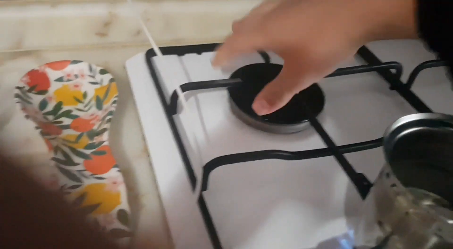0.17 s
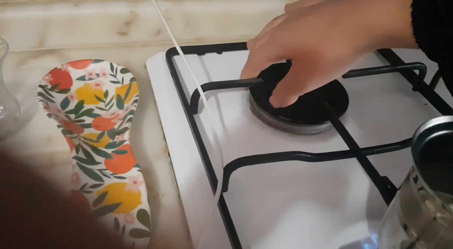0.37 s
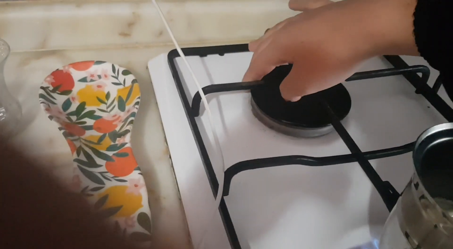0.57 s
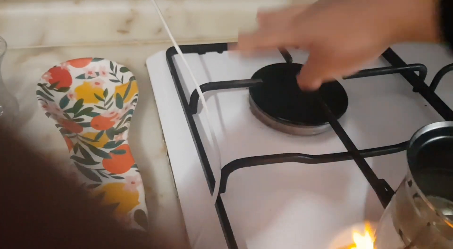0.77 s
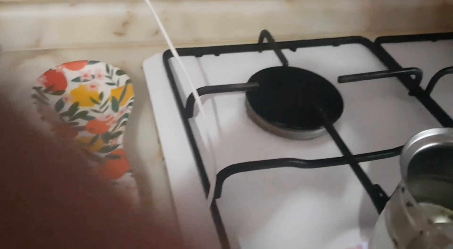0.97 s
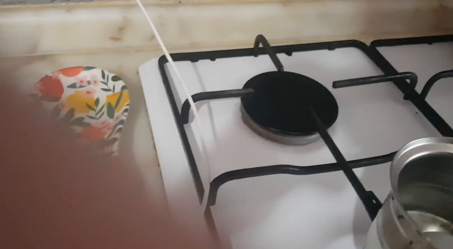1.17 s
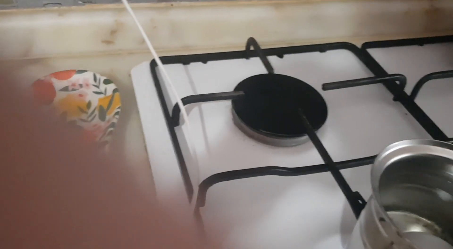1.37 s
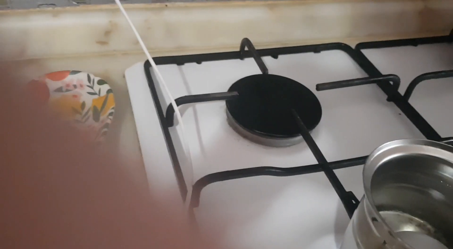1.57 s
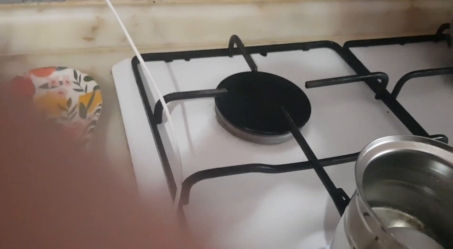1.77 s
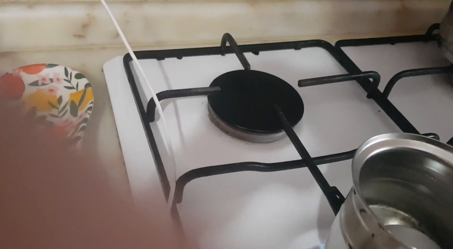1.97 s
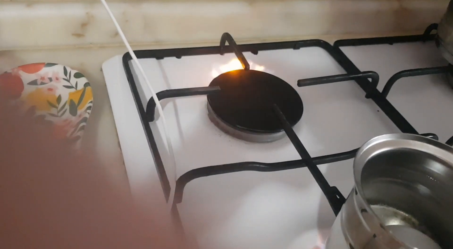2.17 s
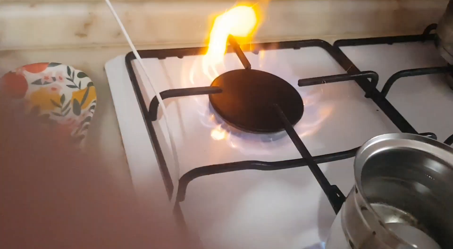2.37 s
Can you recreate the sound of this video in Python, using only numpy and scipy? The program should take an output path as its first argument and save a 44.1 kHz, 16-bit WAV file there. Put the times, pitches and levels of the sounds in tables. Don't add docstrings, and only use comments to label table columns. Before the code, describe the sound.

A metal burner cap clanks onto a gas stove, then an igniter snaps twice and flame catches

```python
import sys
import numpy as np
from scipy import signal
from scipy.fft import rfft, irfft
from scipy.io import wavfile
from scipy.ndimage import uniform_filter1d

SR = 44100
rng = np.random.default_rng(int(sys.argv[2]) if len(sys.argv) > 2 else 0)


def master_out(mix):
    frames = np.transpose(np.atleast_2d(mix))
    ceiling = np.clip(frames, -1, 1)
    pcm = np.round(ceiling * 32767).astype(np.int16)
    wavfile.write(sys.argv[1], SR, pcm)


def level_to_linear(level):
    exponent = np.asarray(level, float) / 20
    return 10 ** exponent


N = 106369
T = np.arange(N) / SR
LEFT_RIGHT = np.array([[1], [-1]])
HELD = T < 0.7
TREBLE_LEFT_DB = 6


def unit(x):
    return x / np.sqrt(np.mean(x ** 2) + 1e-30)


def curve(rows, col=1):
    return np.interp(T, [r[0] for r in rows], [r[col] for r in rows])


def colour(x, points):
    f = np.arange(x.shape[-1] // 2 + 1) * SR / x.shape[-1] + 1
    p = np.array(points, float)
    gain = level_to_linear(np.interp(np.log(f), np.log(p[:, 0]), p[:, 1]))
    return irfft(rfft(x) * gain, x.shape[-1])


def band(x, hz, width_hz):
    return signal.lfilter(*signal.iirpeak(min(hz, .45 * SR), max(hz / width_hz, .3), SR), x)


def ring(x, modes):
    total = 0
    for hz, db, t60 in modes:
        pole = np.exp(2j * np.pi * hz / SR - np.log(1000) / (t60 * SR))
        total = total + level_to_linear(db) * signal.lfilter([1], [1, -pole], x).imag
    return total


def pair(alike_hz):
    mid, side = rng.standard_normal((2, N))
    treble = signal.butter(2, alike_hz, "high", fs=SR, output="sos")
    side = 0.23 * side + signal.sosfilt(treble, side)
    return np.array([mid + side, mid - side])


def walk(rate):
    k = int(SR / rate)
    return unit(uniform_filter1d(uniform_filter1d(rng.standard_normal(N), k), k))


def tail(x, t60, top_t60, points=((20, 0), (20000, 0)), alike_hz=600):
    noise = colour(pair(alike_hz), points)[:, :SR // 2]
    low = signal.sosfilt(signal.butter(1, 2500, fs=SR, output="sos"), noise)
    t = T[:SR // 2]
    h = low * level_to_linear(-60 * t / t60) + (noise - low) * level_to_linear(-60 * t / top_t60)
    return signal.fftconvolve(x[None], h / np.sqrt(np.sum(h ** 2) / 2), axes=1)[:, :N]


def ports(x, left_db):
    lag_s = .00005
    top = signal.sosfilt(signal.butter(1, 1500, "high", fs=SR, output="sos"), x)
    left = x + (level_to_linear(left_db / 2) - 1) * top
    right = np.interp(T - lag_s, T, x + (level_to_linear(-left_db / 2) - 1) * top)
    return np.array([left, right])


def burst(at, rise, hold, fall):
    attack = np.clip((T - at) / rise, 0, 1)
    return attack * np.exp(-np.clip(T - at - rise - hold, 0, None) / fall)


# f/Hz, spectral level/dB
KITCHEN_COLOUR = [(15, -50), (25, -14.5), (75, -10), (159, -11.5), (195, -34.5), (253, -11), (324, -22),
                  (415, -14.5), (540, -25.5), (680, -60), (1300, -88.5), (2200, -120)]
# t/s, level/dB
KITCHEN_LEVEL = [(0, -55), (.3, -47.5), (1.0, -49), (1.3, -57.5), (1.45, -58), (1.55, -49), (1.7, -57),
                 (2.42, -63)]
# f/Hz, spectral level/dB
HISS_COLOUR = [(410, -28), (700, -15.5), (900, -28), (1840, -10), (3410, -32), (4730, -5), (5840, -22.5),
               (11700, -7.5), (16000, -21.5)]
# f/Hz, spectral level/dB
SLEEVE_COLOUR = [(150, -19), (300, 5), (800, -1.5), (1900, -8.5), (2300, -17.5), (2900, -20.5),
                 (3500, -14.5), (4500, -22.5)]
# t/s, level/dB
SLEEVE_LEVEL = [(0, -53), (.05, -53), (.1, -62.5), (.2, -75.5), (.5, -66), (.58, -53.5), (.68, -54.5),
                (.74, -66), (.8, -100)]


def kitchen():
    low = unit(colour(pair(1200), KITCHEN_COLOUR)) * level_to_linear(curve(KITCHEN_LEVEL) + 2 * walk(36))
    sleeve = unit(colour(pair(800), SLEEVE_COLOUR)) * level_to_linear(curve(SLEEVE_LEVEL) + 2 * walk(40))
    hiss = level_to_linear(-67.5 + 4.5) * unit(colour(pair(300), HISS_COLOUR))
    return low + hiss + sleeve


# t/s, level/dB, contact hardness f/Hz, level of the rough edge/dB
KNOCKS = [(0.3122, -24.5, 750, -15), (0.3165, -36, 1200, -14), (0.333, -28.5, 1190, -7),
          (0.3793, -29.5, 900, -17), (0.3868, -21.5, 2100, -25), (0.3884, -10, 2700, -19),
          (0.391, -22, 2580, -19), (0.402, -39, 700, -7.5), (0.406, -40, 1200, -9),
          (0.4487, -22.5, 1720, 13.5), (0.4483, -19, 1650, 5.5), (0.534, -44.5, 1000, -1.5),
          (0.7544, -6, 1800, 17), (0.7572, -11.5, 2500, 5), (0.7611, -17.5, 1500, 5.5),
          (0.771, -12.5, 2190, -2), (0.7751, -21.5, 2470, 0.5), (0.794, -39.5, 496, -4)]


def knock_forces():
    push, edge = np.zeros(N), np.zeros(N)
    contact_s = .00015
    for at, db, hard_hz, edge_db in KNOCKS:
        grit = (1 + rng.standard_normal(N)) * burst(at, .0001, 0, contact_s)
        blow = burst(at, 0.00025, 0, 0.14 / hard_hz)
        push -= level_to_linear(db) * blow / blow.sum() * 4
        edge += level_to_linear(db + edge_db) * grit / np.sqrt(np.sum(grit ** 2))
    return push, edge


# t/s, level/dB
SCRAPE = [(.308, -80.5), (.314, -30), (.345, -39.5), (.365, -52), (.385, -22.5), (.42, -57.5), (.46, -41),
          (.55, -80.5)]


def scrape_force():
    slips_per_s = 1100
    slips = (rng.random(N) < slips_per_s / SR) * rng.standard_normal(N)
    return level_to_linear(curve(SCRAPE)) * unit(slips)


CAP_HZ = [1135, 1190, 1254, 2350, 3328, 4800, 5600, 6277, 6530, 7811, 8866, 10080, 10760, 11850, 13300]
# level/dB, T60/s
CAP_MODES = [(-9.5, 0.058), (2.5, 0.04), (-15.5, 0.044), (-19.5, 0.0614), (-16, 0.18), (-13, 0.04),
             (-28, 0.16), (-17.5, 0.13), (-12.5, 0.08), (-23.5, 0.095), (-12.5, 0.23), (-14, 0.31),
             (-11, 0.17), (-13.5, 0.084), (-16, 0.065)]
# f/Hz, level/dB, T60/s
RIM_MODES = [(7138, -19.5, .07), (7370, -21.5, .1), (7950, -19.5, 0.0584), (9040, -8.5, 0.082),
             (9586, -5.5, 0.097), (9200, -3, .07), (11066, -11, 0.0805), (11390, -9, .08), (12180, -9, .1),
             (12680, -9, 0.12), (13800, -13.5, .1), (14230, -14.5, .1), (14630, -15.5, .1)]


def cap_ringing(edge, slide):
    held_t60_s = 0.052
    free = [(hz, *mode) for hz, mode in zip(CAP_HZ, CAP_MODES)]
    damped = [(hz, db, min(t60, held_t60_s)) for hz, db, t60 in free]
    body = ring((edge + 0.58 * slide) * HELD, damped) + ring(edge * ~HELD, free)
    held_rim = ring(edge * HELD, [(6600, 1, .1), (11770, -3.5, .12), (13300, -4, .1)])
    return level_to_linear(-27.5) * body + level_to_linear(-42.5) * held_rim + level_to_linear(-44) * ring(edge * ~HELD, RIM_MODES)


# f/Hz, level/dB, T60/s
PRESSED_MODES = [(120.4, 0.5, 0.15), (168.9, 1, 0.13), (200, -6.5, 0.26), (295, -12, 0.16), (324, 5, .07),
                 (412, -0.5, 0.051), (478, 1, 0.1), (570, -3, 0.08), (677, 4, 0.08), (920, -26, .06),
                 (1311, -11.5, 0.0277)]
# f/Hz, level/dB, T60/s
PANEL_MODES = [(117.2, 5, 0.33), (173.2, 7, 0.38), (188, -3, 0.31), (237, -21, 0.25), (310.7, -11, .3),
               (399, -7, 0.1937), (463, -2, 0.382), (595, -9, 0.44), (588.5, -6.5, 0.3), (680, -9, 0.33),
               (865, -29, 0.038), (1540, -2, 0.12)]
# f/Hz, level/dB, T60/s
BOOM_MODES = [(74.2, 2, 1.07)]
# f/Hz, level/dB, T60/s
CRACK_MODES = [(394, -3, 0.033), (595, -0.5, 0.014), (1180, 4.5, 0.012), (2408, 0, 0.019), (3400, 2, 0.013),
               (4440, -14, 0.024)]


def stove_ringing(push, slide):
    panel = ring((push + 1.06 * slide) * HELD, PRESSED_MODES) + ring(push * ~HELD, PANEL_MODES)
    boom = ring(push * level_to_linear(-15.5 * HELD), BOOM_MODES)
    thud = ring(push - band(push, 45.15, 250), CRACK_MODES)
    return level_to_linear(-27) * panel + level_to_linear(-34.5) * boom + level_to_linear(-8.5) * thud


# f/Hz, spectral level/dB
CLATTER_COLOUR = [(60, -38), (150, -4), (400, -12), (900, -18), (1200, -14), (1800, -21.5), (2420, -11.5),
                  (6380, -20), (14700, -45), (15300, -80.5)]
# f/Hz, spectral level/dB
HELD_CLATTER_COLOUR = [(60, -37.5), (150, -9.5), (400, -16.5), (850, -11), (1250, -8.5), (1800, -18.5),
                       (2420, -21), (4500, -28), (7500, -44.5), (15000, -45.5)]


def cap():
    push, edge = knock_forces()
    slide = scrape_force()
    near = cap_ringing(edge, slide) + stove_ringing(push, slide)
    near -= .7 * band(near, 834, 420)
    shake = edge + .3 * push + .5 * slide
    rattle = tail(shake * ~HELD, 0.29, 0.18, CLATTER_COLOUR)
    rattle = rattle + 1.2 * tail(shake * HELD, 0.17, 0.26, HELD_CLATTER_COLOUR)
    across = level_to_linear(-6) * band(near, 610, 260) * np.array([[-1.3], [.7]])
    return ports(near, TREBLE_LEFT_DB) + across, 10 * level_to_linear(-19.5) * rattle


# f/Hz, spectral level/dB
ROCK_COLOUR = [(1500, -29), (2400, -10.5), (2900, -10.5), (3500, -1), (4700, -4.5), (5500, -9), (6500, -4),
               (7000, -27.5)]
# f/Hz, level/dB, T60/s
BELL_MODES = [(6600, 3, 0.5), (6420, 8, 0.41), (4300, 18.5, .047), (4270, 14, 0.037), (4780, 19.5, .06),
              (4880, 17.5, .04)]


def drop():
    drop_s, chatter_t60_s = .7548, .3
    hit = np.zeros(N)
    hit[int(drop_s * SR)] = 1
    colours = ROCK_COLOUR + [(14700, -38.5), (15300, -70)]
    chatter = tail(hit, chatter_t60_s, chatter_t60_s, colours) * level_to_linear(1.9 * walk(300))
    return level_to_linear(2) * chatter + level_to_linear(-38.5) * ports(ring(hit, BELL_MODES), TREBLE_LEFT_DB)


TICK_AT_S = [1.389, 1.494, 1.501, 1.502, 1.538, 1.550, 1.553, 1.565]
# level/dB, f/Hz, width/Hz
TICKS = [(-68, 6100, 3300), (-49.5, 4360, 1250), (-56, 3400, 1160), (-59, 10500, 4200), (-48, 4400, 13000),
         (-53, 15000, 6900), (-47.5, 1300, 2000), (-56, 5900, 710)]
GRIP_AT_S = [
    1.395,
    1.50,
    1.545,
]
GRIP_DB = [-50, -45, -50]


def knob():
    ticks = 0
    for at, (db, hz, width_hz) in zip(TICK_AT_S, TICKS):
        tone = unit(band(rng.standard_normal(N), hz, width_hz))
        ticks = ticks + level_to_linear(db) * tone * burst(at, 0.0006, 0, 0.0032)
    grip = sum(level_to_linear(db) * burst(at, 0.012, 0, 0.043) for at, db in zip(GRIP_AT_S, GRIP_DB))
    soft = [(100, -20), (427, 0), (630, -6), (2.08 * 630, -30), (4000, -45)]  # f/Hz, level/dB
    thud = grip * unit(colour(pair(757), soft))
    return ports(ticks, 17.4) + level_to_linear(0.5) * 2 * tail(ticks, 0.29, 0.1) + thud


JET_HZ = [1165, 3100, 3700, 4580, 6120, 7070, 10300, 11300, 7000]
# width/Hz, level/dB
JET = [(104, 6.5), (430, -9), (297.6, -10.5), (252, -5), (400.9, -14), (190.77, -12), (900, -12.5),
       (1000, -8), (11900, -19)]
# t/s, level/dB
FLOW = [
    (1.5, -78),
    (1.6, -67),
    (1.635, -50.5),
    (2.17, -48.5),
    (2.25, -48.5),
    (2.42, -53),
]


def gas():
    whistle = 0
    for hz, (width_hz, db) in zip(JET_HZ, JET):
        once = band(pair(2000), hz, 1.7 * width_hz)
        whistle = whistle + level_to_linear(db + 1.8 * walk(25)) * band(once, hz, 1.7 * width_hz)
    return unit(whistle) * level_to_linear(curve(FLOW) + 1.5 * LEFT_RIGHT)


SPARK_S = [
    1.7661,
    2.1844,
]
SPARK_DB = [-14.5, -15]
# f/Hz, spectral level/dB
SPARK_COLOUR = [(120, -25), (300, -16), (800, -29), (2330, -21), (3370, -8), (5230, -12), (6760, -0.5),
                (9580, -4.5), (12200, -1.5), (16000, -22.5)]
# f/Hz, spectral level/dB
WASH_COLOUR = [(200, -21), (2000, -11.5), (4000, -5.5), (7000, -0.5), (11500, -2), (14500, -9.5),
               (16000, -21)]


def igniter():
    rise_s, hold_s, fall_s, wash_t60_s = .0011, .0028, .001, 0.19
    arc = unit(colour(rng.standard_normal((2, N)), SPARK_COLOUR)) * level_to_linear(2 * walk(1500))
    gap = int((SPARK_S[1] - SPARK_S[0]) * SR)
    arc[:, -gap:] = arc[:, -2 * gap:-gap]
    shape, fade = 0, 0
    for at, db in zip(SPARK_S, SPARK_DB):
        shape = shape + level_to_linear(db) * burst(at, rise_s, hold_s, fall_s)
        fade = fade + level_to_linear(db) * burst(at, 0.0028, 0, wash_t60_s / np.log(1000))
    snap = shape * (arc[0] + 0.82 * arc[1] * LEFT_RIGHT) * level_to_linear(LEFT_RIGHT * 11.5 / 2)
    wash = unit(colour(pair(600), WASH_COLOUR)) * level_to_linear(1.7 * walk(580) + 1.5 * LEFT_RIGHT)
    return snap + level_to_linear(-6.5) * fade * wash


# t/s, rumble level/dB, roar level/dB, roar centre f/Hz
FLAME = [(2.184, -52.5, -93, 900), (2.196, -29.5, -53, 900), (2.23, -27.5, -60, 1000),
         (2.276, -29.5, -44, 1100), (2.283, -31, -42, 1140), (2.32, -27, -40, 1250),
         (2.355, -31.5, -39, 1370), (2.38, -40.5, -49, 1350), (2.42, -41, -63, 1220)]
# f/Hz, spectral level/dB
RUMBLE_COLOUR = [(18, -50.5), (30, -29), (59, -0.5), (85, -5.5), (118, -1), (190, -9.5), (268, -5.5),
                 (352, -17.5), (613, -25), (900, -39.5), (1170, -54.5), (1980, -120)]


def flame():
    rumble = unit(colour(pair(1500), RUMBLE_COLOUR)) * level_to_linear(curve(FLAME) + 2 * walk(40))
    centre, noise = curve(FLAME, col=3), pair(1800)
    roar_width_hz = 500
    roar = 0
    for hz in range(400, 2800, 250):
        nearness = np.exp(-((hz - centre) / roar_width_hz) ** 2 * 2)
        roar = roar + band(band(noise, hz, 310), hz, 310) * nearness
    hiss = unit(band(pair(1500), 4204, 900))
    roar = unit(roar) + level_to_linear(-11) * hiss
    return rumble + roar * level_to_linear(curve(FLAME, col=2) + 2 * walk(60))


def scene():
    near, rattle = cap()
    room = level_to_linear(-4) * tail(near.mean(axis=0), 0.35, 0.16, alike_hz=1500)
    return kitchen() + near + rattle + room + drop() + knob() + gas() + igniter() + flame()


def top_cut(x):
    return signal.sosfilt(signal.butter(12, 16680, fs=SR, output="sos"), x)


def record(dry):
    x = signal.sosfilt(signal.butter(4, 55, "high", fs=SR, output="sos"), dry)
    x = signal.sosfilt(signal.ellip(6, .3, 60, 15900, fs=SR, output="sos"), np.tanh(x))
    return top_cut(0.78 * x)


dry = scene()
out = record(dry)
master_out(out)
```